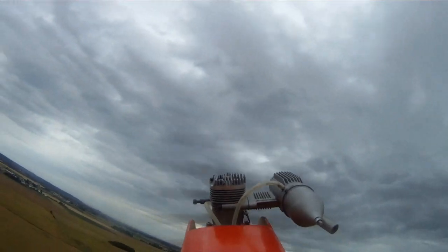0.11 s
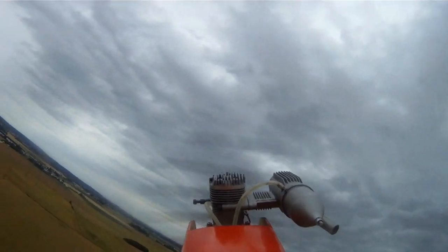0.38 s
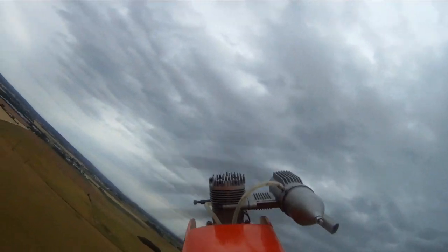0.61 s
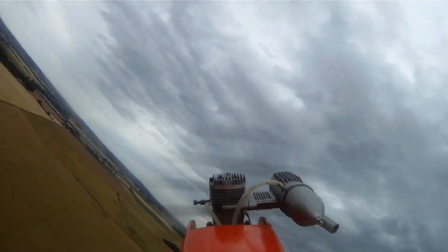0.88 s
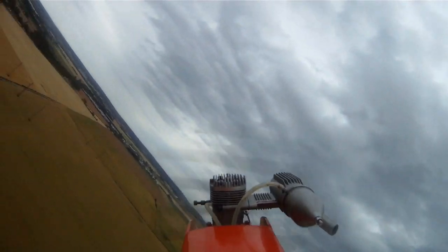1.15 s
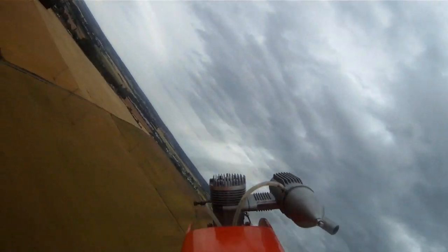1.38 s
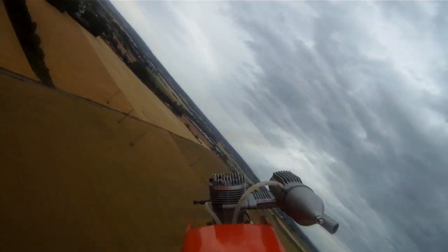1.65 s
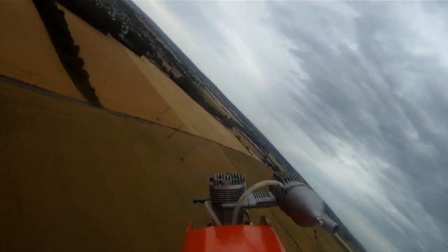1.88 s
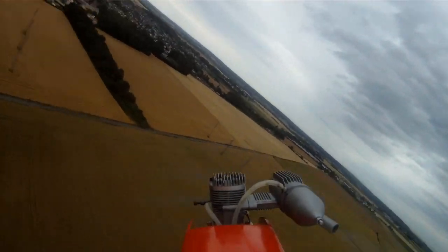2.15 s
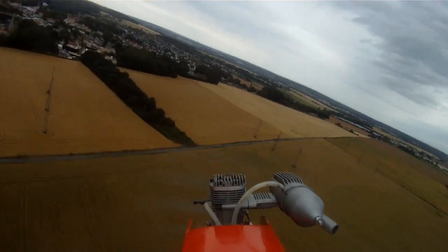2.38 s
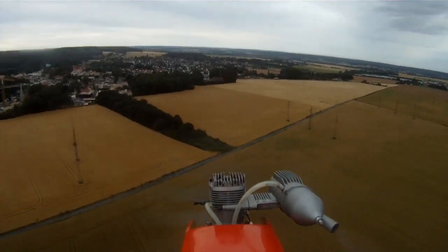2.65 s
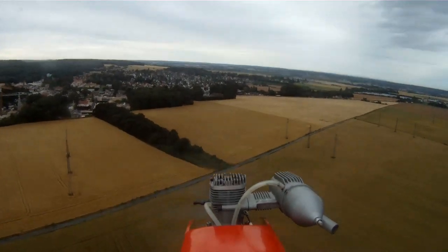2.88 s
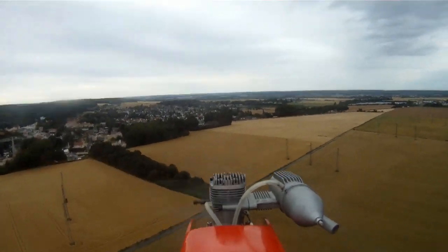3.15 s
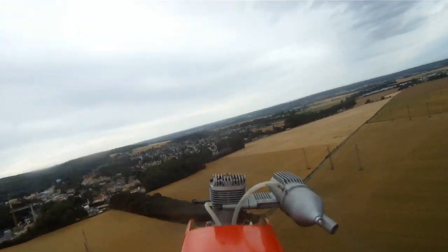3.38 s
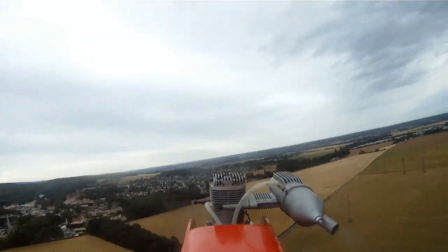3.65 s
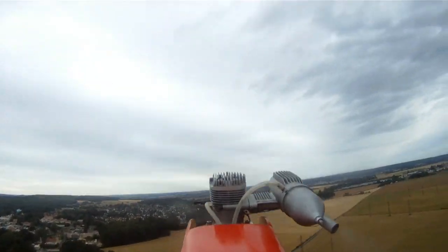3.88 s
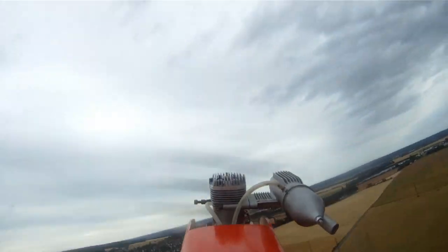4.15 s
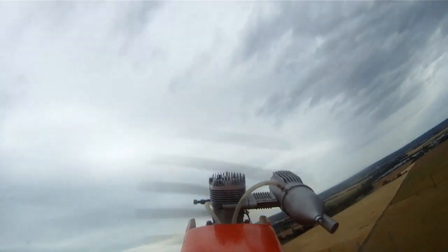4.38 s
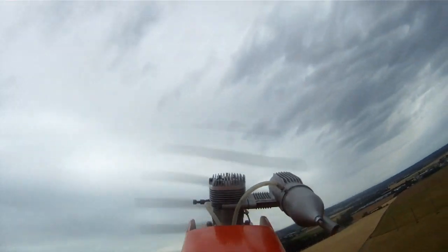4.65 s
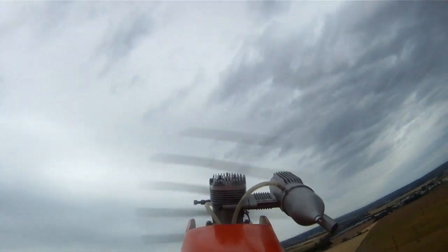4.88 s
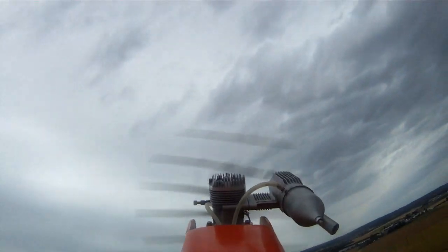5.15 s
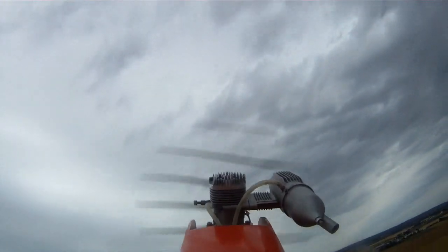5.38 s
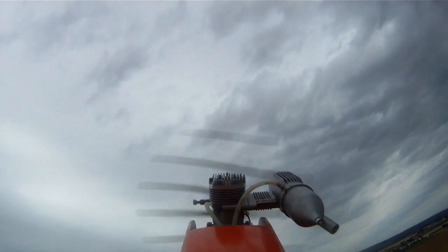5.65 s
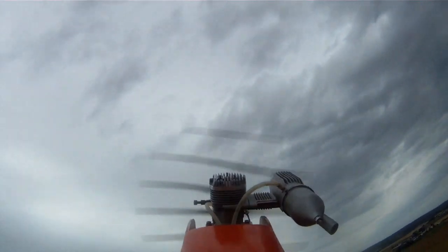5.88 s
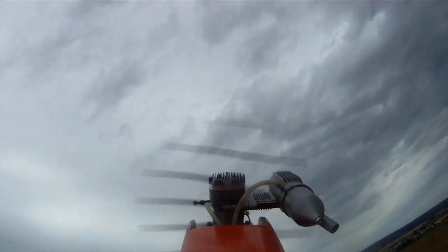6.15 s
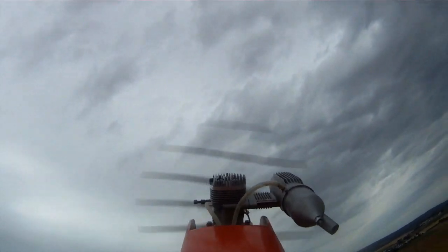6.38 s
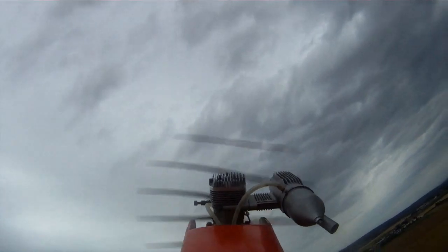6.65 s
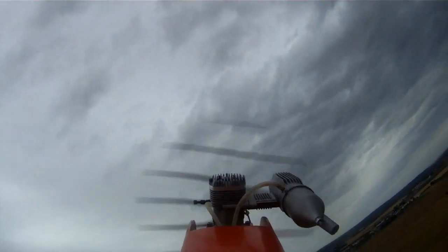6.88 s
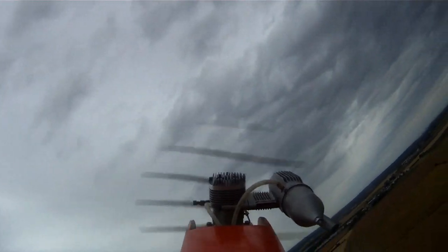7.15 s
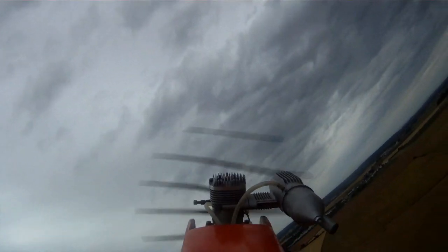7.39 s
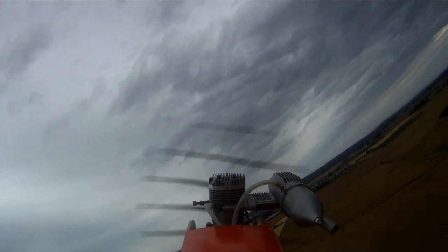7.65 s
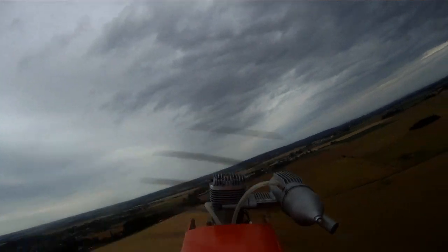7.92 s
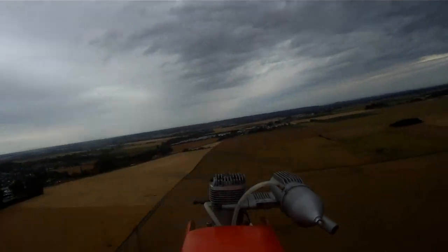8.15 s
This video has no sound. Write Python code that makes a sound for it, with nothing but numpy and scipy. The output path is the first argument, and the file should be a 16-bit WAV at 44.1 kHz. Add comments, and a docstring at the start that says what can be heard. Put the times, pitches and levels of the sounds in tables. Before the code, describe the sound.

Close, harsh buzz of a little model aircraft engine in flight, nearly constant in pitch, with gritty metallic chatter, faint wind, and a last-moment rev-up.

```python
"""A small two-stroke glow engine pulls a model plane through a long bank, heard by a camera bolted to the fuselage.
Shaft, propeller and exhaust give clean lines on multiples of the shaft speed. Uneven firings and two knocks a turn
ring the airframe, over a low wind rumble. The camera cuts the sound near 4 kHz and holds each of its
12000 samples a second, which mirrors it into the treble."""
import sys
import numpy as np
from scipy import signal
from scipy.fft import rfft, irfft
from scipy.io import wavfile
from scipy.ndimage import uniform_filter1d

SR = 44100
rng = np.random.default_rng(int(sys.argv[2]) if len(sys.argv) > 2 else 0)


def digitize_waveform(pressure):
    """Quantize a signal to 16-bit integers and store it at the path in sys.argv[1].

    Rows of a 2-D input are taken as channels; values are limited to [-1, 1].
    """
    field = np.atleast_2d(pressure).T
    bounded = np.clip(field, -1, 1)
    quanta = np.round(bounded * 32767).astype(np.int16)
    wavfile.write(sys.argv[1], SR, quanta)


def gain_from_decibels(decibels):
    """Convert decibel values to linear amplitude factors."""
    exponent = np.asarray(decibels, float) / 20
    return 10 ** exponent


N = 365148

# Shaft speed as airspeed unloads and the climb loads the propeller: (time [s], shaft speed [turns/s])
SHAFT_SPEED = [(0.0, 127.6), (0.4, 127.9), (0.9, 125.6), (1.6, 125.7), (2.2, 125.3), (2.7, 126.4),
               (3.15, 127.3), (3.6, 126.9), (3.95, 127.8), (4.7, 128.1), (5.3, 127.1), (6.1, 126.3),
               (7.0, 125.7), (8.1, 125.7)]
# Jolts after which the speed hunts up and down: (time [s], swing before decay, positive first goes up [Hz])
SPEED_JOLTS = [(1.02, 0.8), (1.62, 0.3), (1.86, -0.4), (3.31, -0.4), (3.6, -0.4), (6.33, -0.5), (6.44, 0.5),
               (6.55, 1.0), (6.69, 1.4), (6.8, -1.1), (7.07, -0.9), (7.96, -1.1)]
# Clean lines; strong and weak firings in turn give the half multiples: (multiple of shaft speed [1],
# relative level [dB], level gained with speed as the line nears a resonance [dB/Hz], waver [dB], shake depth [0-1])
SHAFT_LINES = [(1, -9, -0.4, 0.7, 0.02), (2, -1, -0.5, 0.4, 0.02), (3, -23, -0.2, 0.5, 0.16),
               (4, -16.5, -0.3, 0.5, 0.08), (5, -10.5, -1, 0.43, 0.05), (6, -18, 1, 1.5, 0.07),
               (7, -9, -0.6, 1, 0.28), (8, -3, 0.86, 0.5, 0.02), (9, -22.5, -3, 2, 0.4),
               (11, -16.5, 1, 1.5, 0.24), (12, -24.5, 1, 3, 0.3), (16, -22.5, 2.5, 3, 0.1),
               (1.5, -38.5, 0.5, -1, 0), (3.5, -45, -4, 6, .1), (5.5, -41.5, -8, 6, 0.2),
               (6.5, -23.5, -3, 1, 0)]
# Airframe resonances rung by firings: (centre [Hz], nominal width [Hz], relative level [dB])
AIRFRAME_MODES = [(220, 200, -23), (490, 73, -12), (672, 45, -6), (806, 99, -2), (1024, 174, 0)]
# Knocks in each turn: (place in the turn [0-1], timing scatter [ms], size scatter before rebound [dB],
# rattle decay [turns], rattle level against the blows [dB])
KNOCK_PAIR = [(.38, .15, 0.57, 1, -4.5), (.78, .22, 2, 0.35, -2.5)]
# Resonances rung by knocks: (centre [Hz], nominal width [Hz], firing knock level [dB], port knock level [dB])
CASE_MODES = [(908, 375, -8.5, -5), (1421, 110, -5, 0), (1569, 166, -17.5, 0), (1991, 302, 0.5, -3),
              (2356, 98, -5, -4), (2513, 780, -17.5, -13.5), (3043, 322, -10, -9), (3283, 264, -11.5, -9),
              (3907, 500, -13, -29), (5270, 1170, -21, -19)]
# Wind rumble spectrum: (frequency [Hz], relative density [dB per Hz])
WIND_SPECTRUM = [(20, -14), (45, -10), (100, -4), (300, -18), (600, -15.5), (1000, -32)]
# Wing and fuselage modes rung by buffeting: (centre [Hz], nominal width [Hz], level [dB])
BUFFET_MODES = [(76, 8.8, -47), (115, 7.2, -48), (234.5, 24, -36)]
# Lobes that pass the steep cut: (centre [Hz], nominal width [Hz], level [dB])
CUT_LEAKS = [(4525, 650, -10.5), (5200, 330, -14), (5710, 470, -12.5)]


def level(x, db):
    """Scale to an rms level in dB."""
    return x * gain_from_decibels(db) / np.sqrt(np.mean(x ** 2))


def ring(x, hz, width):
    """One resonance, gain 1 at its centre."""
    return signal.lfilter(*signal.iirpeak(hz, hz / width, fs=SR), x)


def ring_twice(x, hz, width):
    """The same resonance twice in a row, for steeper skirts."""
    return ring(ring(x, hz, width), hz, width)


def walk(rate):
    """Random levels held 1 / rate s and slewed twice; spread near 1."""
    hold = int(SR / rate)
    steps = np.repeat(rng.standard_normal(N // hold + 1), hold)
    return 1.3 * uniform_filter1d(uniform_filter1d(steps, hold), hold)[:N]


def shaft(t):
    """Shaft speed: a slow curve, hunting after each jolt, a quick flutter and the final spool-up."""
    hunt_hz, hunt_decay_s = 3, 0.4
    throttle_s, spool_hz, spool_s = 8.28, 5.8, 0.05
    hunt = 0
    for start, swing_hz in SPEED_JOLTS:
        since = t - start
        decay = np.exp(-np.abs(since) / hunt_decay_s) * (since > 0)
        hunt = hunt + swing_hz * np.sin(2 * np.pi * hunt_hz * since) * decay
    opening = np.exp((t - throttle_s) / spool_s)  # reaches 1 at throttle_s
    slow = np.interp(t, *np.transpose(SHAFT_SPEED))
    return slow + hunt + spool_hz * opening + 0.15 * walk(12), opening


def hum(hz, turns, fourth_db, halves_db, firing=0.6306, blade=0.4):
    """Steady multiples of the shaft turn: shaft and exhaust lines push at the firing, the two blades pass earlier."""
    cruise_hz = 126.5
    # the engine rocks on its mount, which makes every line with shake depth throb and grow side lines
    shake = level(ring(rng.standard_normal(N), 24.5, 5.5), 0)
    speed_change = np.clip(hz - cruise_hz, -2, 2)
    out = 0
    for k, db, slope_db, waver_db, depth in SHAFT_LINES:
        line_db = db + slope_db * speed_change + waver_db * walk(14)
        if k == 4:
            line_db = line_db + fourth_db
        if k in (1.5, 3.5):
            line_db = line_db + halves_db
        place = blade if k in (2, 3) else firing
        phase = 2 * np.pi * k * (turns - place) + 0.0095 * k * walk(14)
        out = out + gain_from_decibels(line_db) * (1 + depth * shake) * np.cos(phase)
    return level(out, 0)


def firings(turns, late=0.606, gas_db=6.0):
    """What each firing has more or less than the mean, a strong one starving the next, over rushing gas."""
    count = (turns + 1 - late).astype(int)
    excess = signal.lfilter([1], [1, 0.6], rng.standard_normal(N // 200))
    pulses = level(np.diff(count, prepend=count[0]) * excess[count], 0)
    push = pulses + level(rng.standard_normal(N), gas_db)
    modes = sum(gain_from_decibels(db) * ring_twice(push, f, 0.99 * w) for f, w, db in AIRFRAME_MODES)
    return level(modes, 0)


def knocks(turns, between=0.85, rebound=0.27):
    """Two sharp knocks every turn, never quite on time, each with a rattle and its own balance of resonances."""
    out = 0
    for k, (place, scatter_ms, scatter_db, decay, rattle_db) in enumerate(KNOCK_PAIR):
        since = turns + 1 - place
        chance = rng.standard_normal((N // 200, 2))
        at = np.flatnonzero(np.diff(since.astype(int)))
        moved = (at + scatter_ms * SR / 1000 * chance[:len(at), 0]).astype(int)
        # a strong knock tends to be followed by a weak one
        size_db = scatter_db * signal.lfilter([1], [1, rebound], chance[:len(at), 1])
        blows = np.zeros(N)
        blows[np.clip(moved, 0, N - 1)] = gain_from_decibels(size_db)
        # the rattle fades after each knock but never stops
        rattle = (np.exp(-(since % 1) / decay) + between) * rng.standard_normal(N)
        burst = level(blows, 0) + level(rattle, rattle_db)
        for j, row in enumerate(CASE_MODES):
            # neighbouring resonances take opposite polarity
            out = out + (-1) ** j * gain_from_decibels(row[2 + k]) * ring_twice(burst, row[0], 1.4 * row[1])
    return level(out, 0)


def wind(db=-45, gust_db=1.2):
    """Low slipstream rumble on the housing; the buffeting also rings the airframe."""
    hz, per_hz_db = np.transpose(WIND_SPECTRUM)
    f = np.arange(N // 2 + 1) * SR / N + 1  # the added 1 keeps the log finite
    shape = gain_from_decibels(np.interp(np.log(f), np.log(hz), per_hz_db, right=-90))
    noise = irfft(rfft(rng.standard_normal(N)) * shape, N)
    rumble = level(noise * gain_from_decibels(gust_db * walk(2.1)), db)
    modes = 0
    for f, w, mode_db in BUFFET_MODES:
        modes = modes + level(ring(ring(rng.standard_normal(N), f, w), f, 2 * w), mode_db)
    return rumble + modes


def scene():
    """Engine layers share one shaft phase; the roll and the throttle set their levels over the wind."""
    t = np.arange(N) / SR
    hz, opening = shaft(t)
    turns = np.cumsum(hz + 0.15 * walk(40)) / SR
    # the plane rolls out of one bank into the other and the engine pulls harder
    roll_s, roll_length_s = 3.15, 0.21
    rolled = (1 + np.tanh((t - roll_s) / roll_length_s)) / 2

    def ride(start_db, roll_db, throttle_db):
        """Level before the roll, its change over the roll and its change as the throttle opens."""
        return start_db + roll_db * rolled + throttle_db * opening

    # a laboured spell: strong and weak firings alternate more and the knocks harden
    labour_s, labour_length_s, halves_db, harder_db = 4, 1, 9, 0.8
    labour = np.exp(-((t - labour_s) / labour_length_s) ** 2)
    settle_db_per_s = -0.58  # firings grow more even as the run goes on
    lines = hum(hz, turns, ride(-4.5, 5.5, 2), halves_db * labour)
    engine = gain_from_decibels(ride(-12.5, 0.53, -2)) * lines
    engine = engine + gain_from_decibels(ride(-20, -0.5, 11) + settle_db_per_s * t) * firings(turns)
    engine = engine + gain_from_decibels(ride(-18, 0.5, -1) + harder_db * labour) * knocks(turns)
    return (engine + wind())[None]


def low_pass(x):
    """Removes everything above the highest recorded frequency."""
    return signal.sosfilt(signal.butter(12, 15940, fs=SR, output="sos"), x)


def record(dry):
    """Soft overload, housing dip, steep cut, then samples held in steps, which repeats the spectrum around 12 kHz."""
    hold_hz, cut_hz, top_hz = 12000, 4150, 15300
    x = np.tanh(0.76 * dry) / 0.85
    x = x - 0.45 * ring(x, 3480.0, 330.0)
    steep = signal.ellip(8, 0.5, 50, cut_hz, fs=SR, output="sos")
    cut = signal.sosfilt(steep, x)
    for j, (f, w, db) in enumerate(CUT_LEAKS):
        cut = cut + (-1) ** j * gain_from_decibels(db) * ring_twice(x, f, w)
    slow = signal.resample_poly(cut, hold_hz // 300, SR // 300, axis=1)
    # repeat each sample four times, then return to SR with the mirrored treble kept
    steps = np.repeat(slow, 4, axis=1)
    held = signal.resample_poly(steps, SR // 300, 4 * hold_hz // 300, axis=1)
    top_cut = signal.ellip(16, 0.2, 70, top_hz, fs=SR, output="sos")
    held = signal.sosfilt(top_cut, held)
    return low_pass(held[:, :N])


dry = scene()
out = record(dry)
digitize_waveform(out)
```